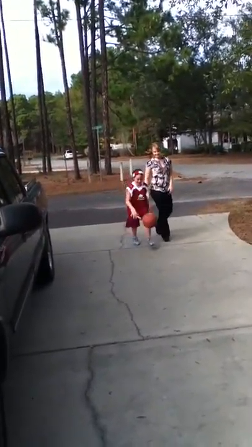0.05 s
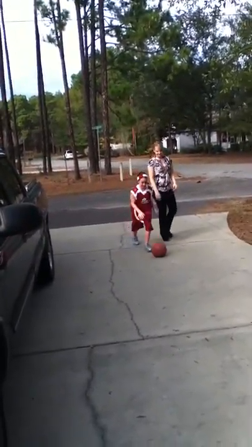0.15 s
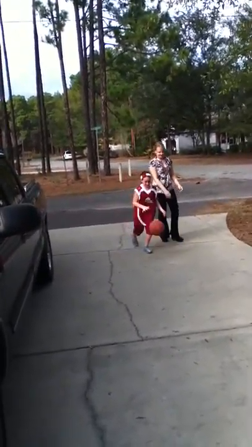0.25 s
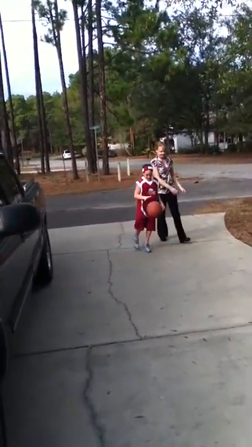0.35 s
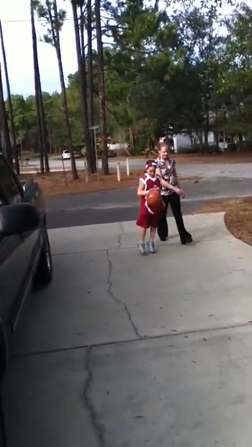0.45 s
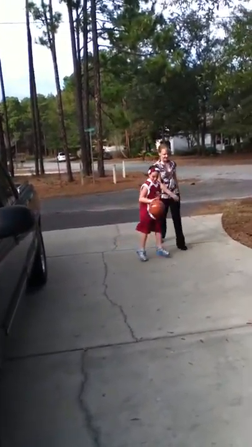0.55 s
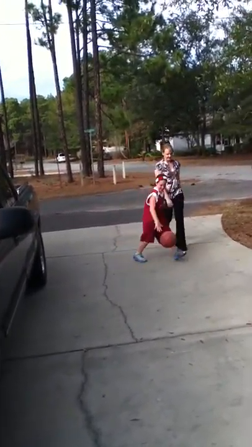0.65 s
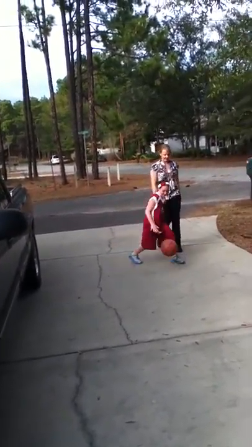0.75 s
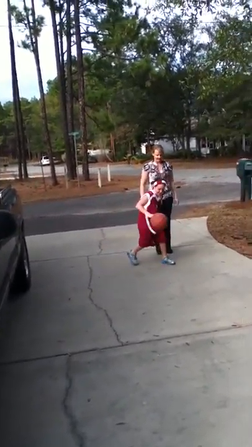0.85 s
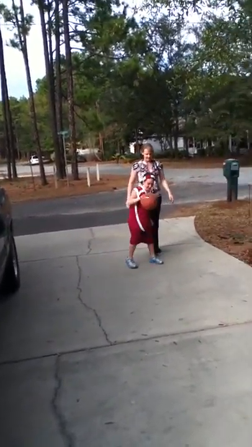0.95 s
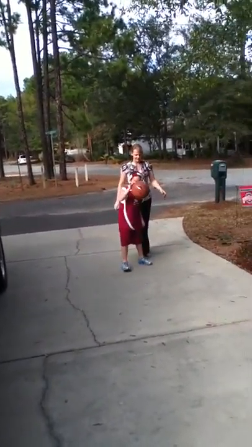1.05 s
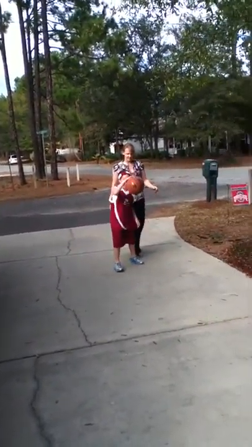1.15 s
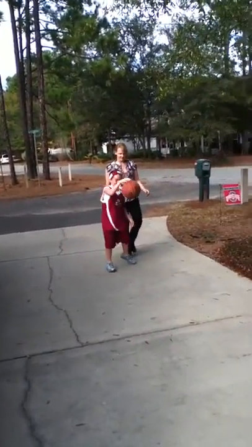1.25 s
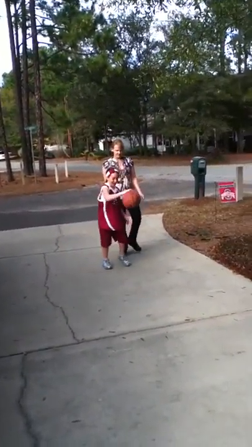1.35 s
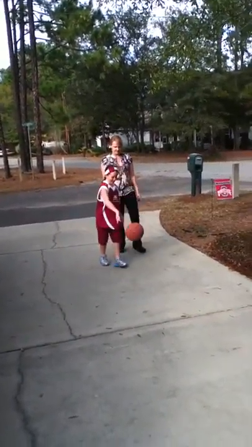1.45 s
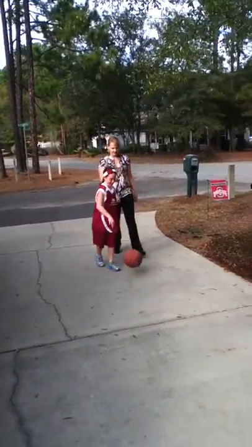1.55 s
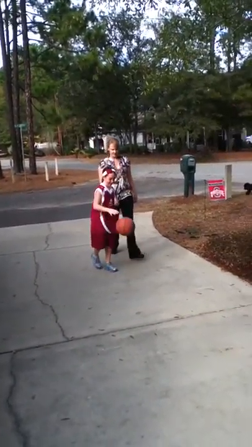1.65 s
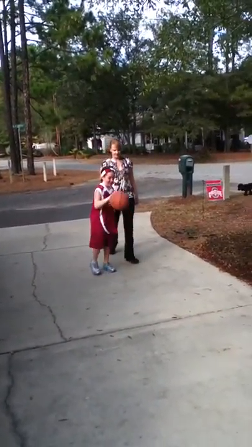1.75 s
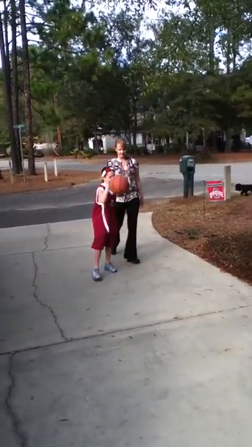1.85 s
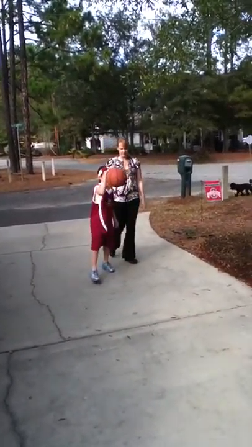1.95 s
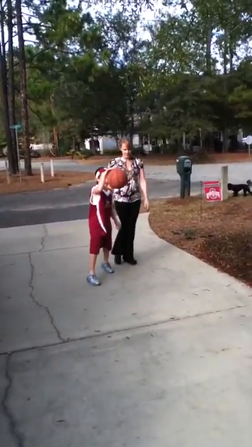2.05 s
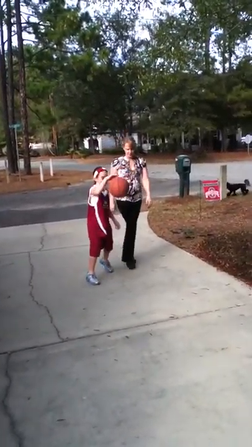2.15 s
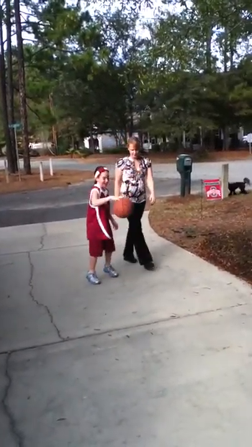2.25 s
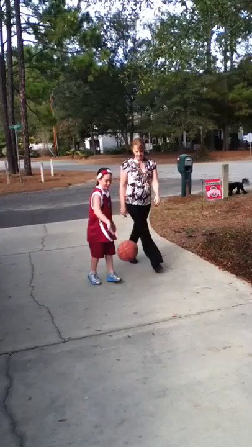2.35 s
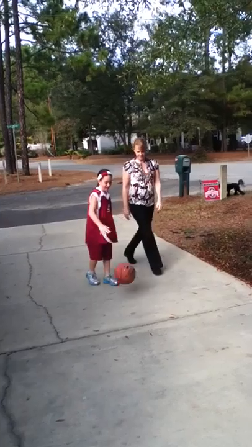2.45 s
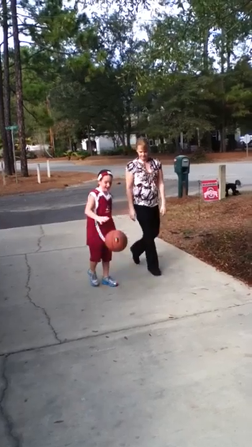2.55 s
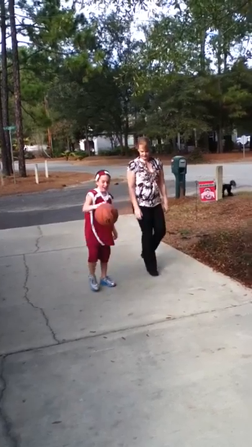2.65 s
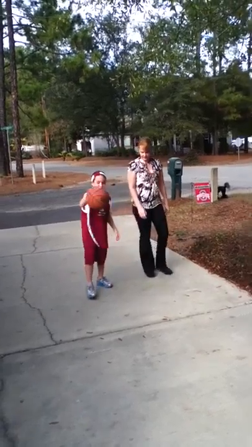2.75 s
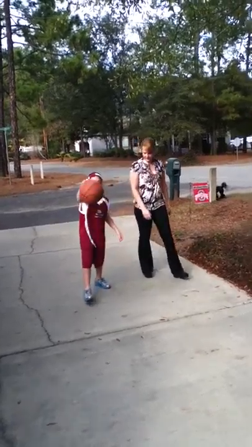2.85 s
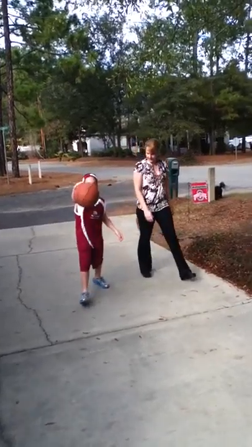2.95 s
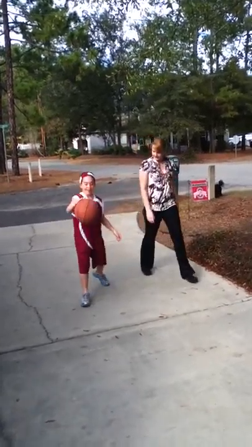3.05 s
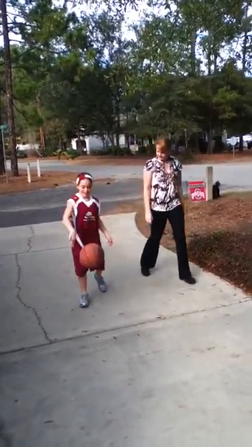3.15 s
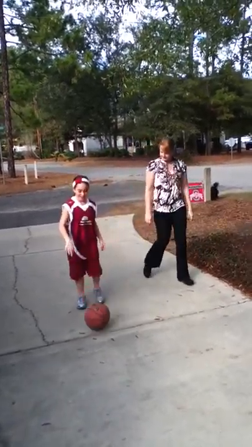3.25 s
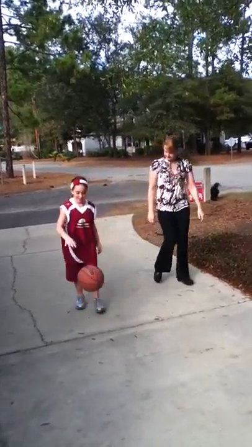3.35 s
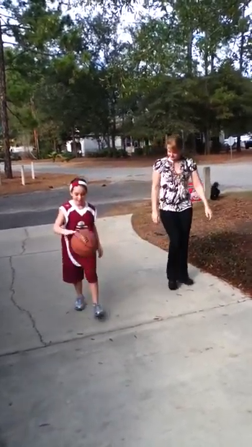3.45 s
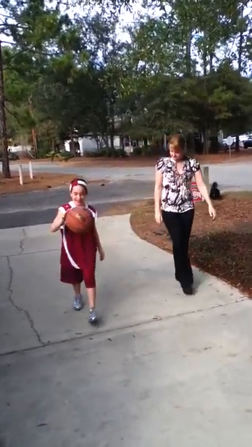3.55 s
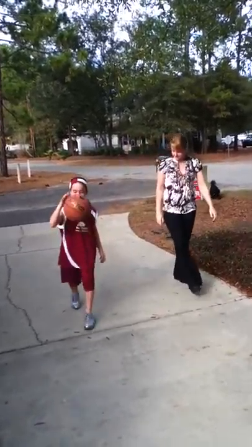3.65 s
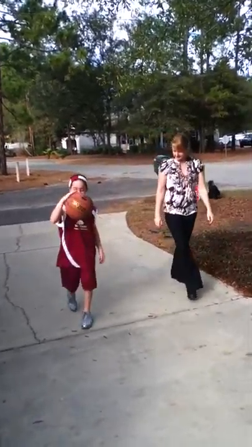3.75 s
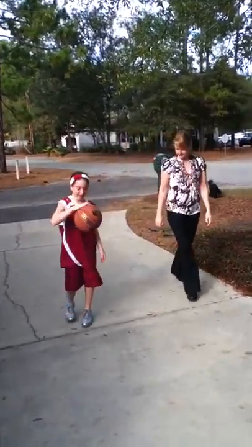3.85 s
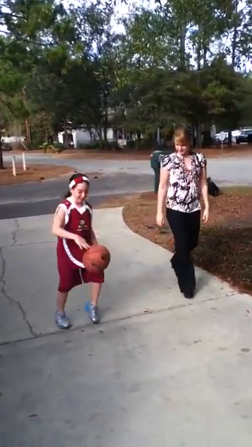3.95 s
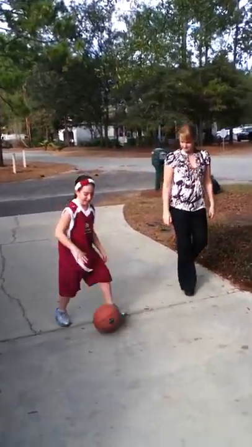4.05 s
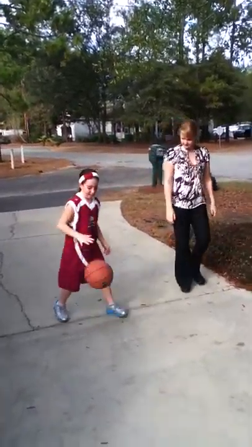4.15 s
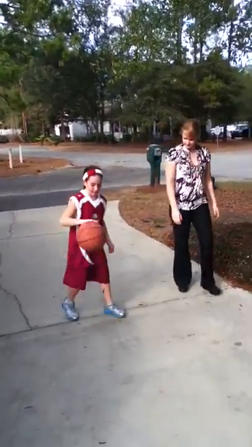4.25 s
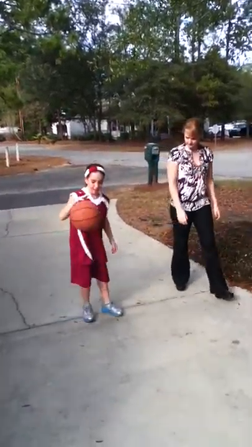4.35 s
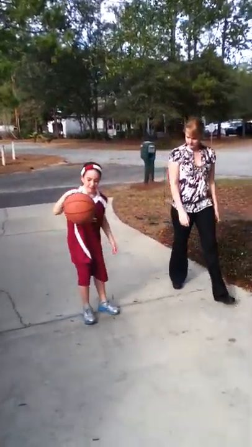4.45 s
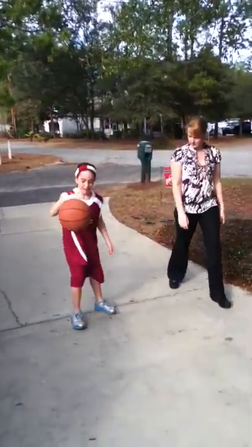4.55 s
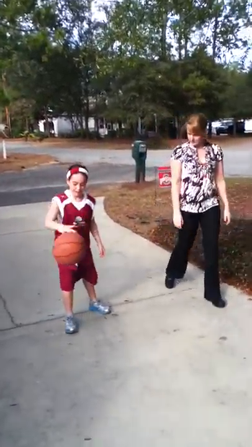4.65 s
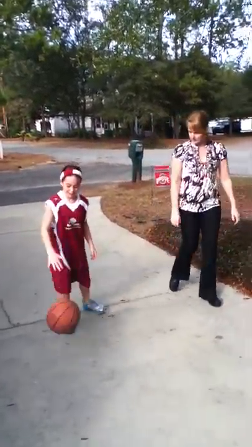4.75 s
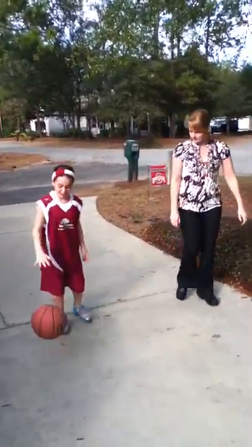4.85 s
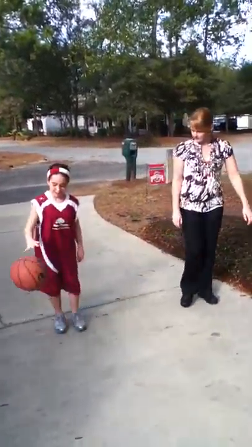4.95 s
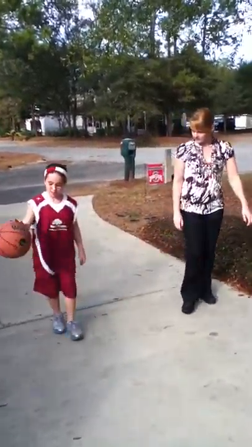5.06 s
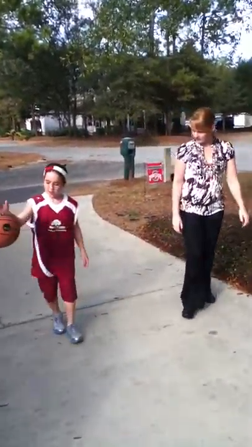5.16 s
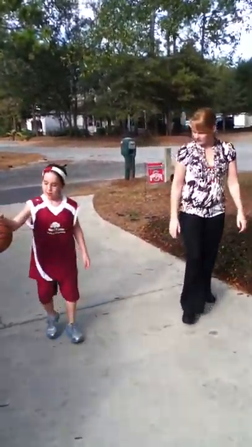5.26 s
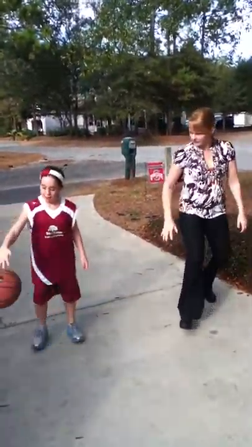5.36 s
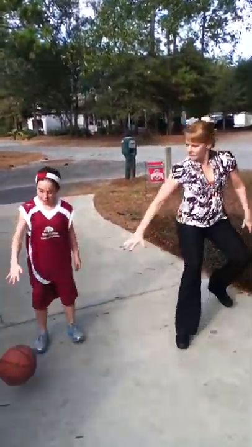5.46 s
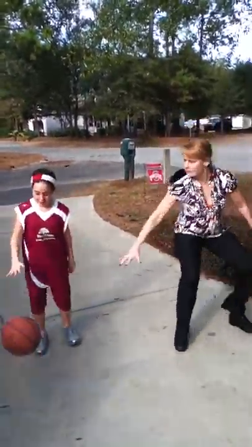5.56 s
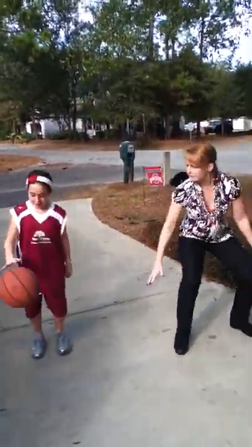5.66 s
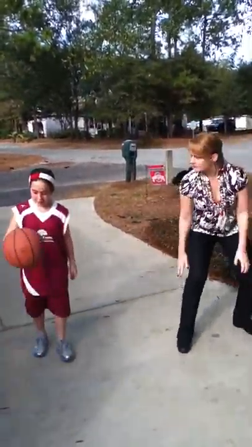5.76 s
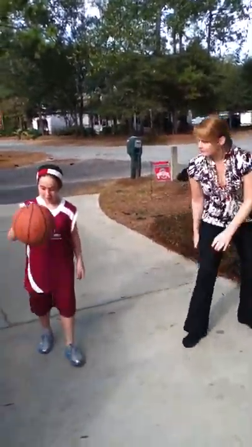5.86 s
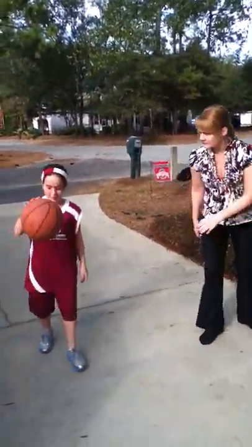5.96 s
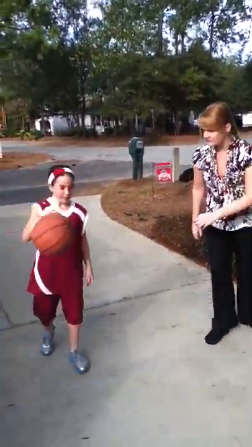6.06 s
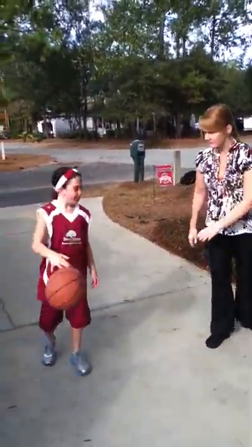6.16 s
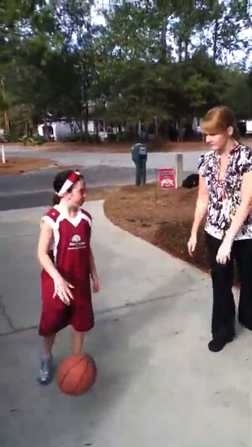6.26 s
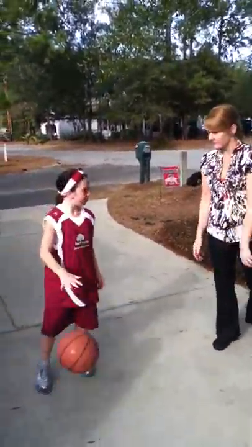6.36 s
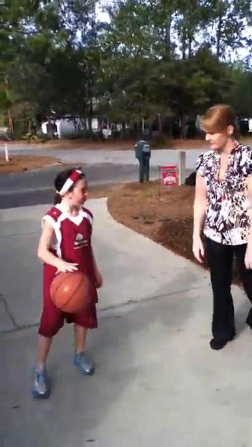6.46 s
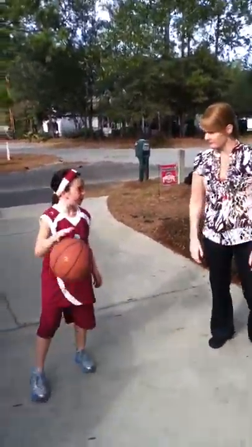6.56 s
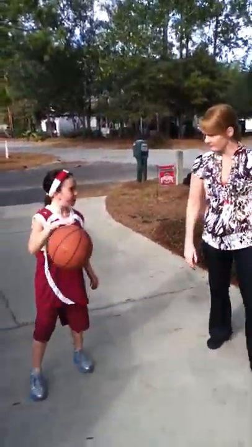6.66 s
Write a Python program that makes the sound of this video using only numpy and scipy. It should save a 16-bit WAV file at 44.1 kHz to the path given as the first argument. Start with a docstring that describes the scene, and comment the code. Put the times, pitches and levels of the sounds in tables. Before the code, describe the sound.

A basketball is dribbled on a concrete driveway close to a hand-held microphone, nine sharp slaps at an easy pace, each with a low thud, a faint ping and a short outdoor echo. Shoes step and scuff on grit between bounces. Distant traffic and leaves rush softly, with a few faint, thin chirps early on. Near the end a hand smacks the ball, a sole drags and a gust buffets the microphone.

```python
"""A basketball bounces on a concrete driveway, close to a hand-held microphone. Each bounce is a slap,
a thud while the ball is squashed and a faint ping of the air inside; a garage door and trees answer.
Hands slap the ball, and shoes land, scuff and drag on grit. Far traffic and leaves rush behind a few
thin chirps, and at the end a gust buffets the microphone."""
import sys
import numpy as np
from scipy import signal
from scipy.fft import rfft, irfft, next_fast_len
from scipy.io import wavfile
from scipy.ndimage import uniform_filter1d, map_coordinates

SR = 44100
rng = np.random.default_rng(int(sys.argv[2]) if len(sys.argv) > 2 else 0)


def master(y):
    """Save y as 16-bit WAV."""
    cut = np.clip(np.atleast_2d(y).T, -1, 1)
    pcm = np.round(cut * 32767)  # scale
    wavfile.write(sys.argv[1], SR, pcm.astype(np.int16))


N = 296352

# modes of the ball's skin: (frequency [Hz], level [dB], t60 [s])
SKIN_MODES = [(483.4, -11.5, 0.081), (621, -2.5, 0.028), (880, -6.5, 0.028), (1625, -2, 0.0081),
              (3120, -2, 0.0038)]


def ball():
    """Each bounce: a slap, a thud, the skin ringing at touch and lift-off, then the ping in flight."""
    # (time [s], slap [dB], squash [dB], bulge [dB], skin [dB], flutter [dB], flutter [Hz], ping [dB])
    bounces = [(0.3202, -1, -13, -2, -13, -1.5, 1343, -62), (0.8702, 1, -20, -6.5, -18, -8, 1330, -57),
               (1.6954, 2.5, -14, -13.5, -16, -23, 1300, -54.5), (2.588, 3, -16, -16, -23, -19, 1440, -61),
               (3.4283, -2, -17, -4.5, -15, -23, 1370, -54.5),
               (4.227, 3.5, -15.5, -25, -14.5, -15, 1455, -54), (4.9715, 0, -14, -4, -12.5, -16, 1340, -55),
               (5.652, -3, -19.5, -5.5, -18, -26, 1400, -61), (6.4551, -3, -11, -5, -9, -16.5, 1420, -48.5)]
    # the skin springs back at lift-off: (frequency [Hz], level [dB], t60 [s])
    peel_modes = [(1400, 0, .018), (1620, -4, .015), (950, -6, .02)]
    track, t = np.zeros(N), np.arange(SR) / SR
    onset = 1 - np.exp(-t / .0022)
    for s, slap_db, squash_db, bulge_db, skin_db, flutter_db, flutter_hz, ping_db in bounces:
        width_s = (.23 + .0077 * bulge_db) / 1000  # the slap widens with the bulge
        impact = amp(slap_db) * (slap(t / width_s) + onset * scatter(t))
        body = onset * thud(t, squash_db, bulge_db)
        smack = lowpass((decay(t, .013) + decay(t, .092, -4.5)) * rng.standard_normal(SR), 4000)
        skin = amp(skin_db) * (ring(SKIN_MODES, t, spread_db=2, detune=.03) + 1.5 * smack)
        skin *= t > width_s  # heard once the slap's pulse has passed
        flutter = np.sin(2 * np.pi * flutter_hz * np.maximum(t - .0002, 0))  # the skin's strongest mode
        flutter *= decay(t, .018, flutter_db)
        peel = amp(skin_db - 1) * onset * ring(peel_modes, t, spread_db=2.5, detune=.051)
        peel = np.roll(peel, round(.0095 * SR))
        add(track, s, impact + body + skin + flutter + peel + amp(ping_db) * ping(t))
    return track


def slap(widths, round_trip_s=.001343):
    """Trapped air shoots out; the pulse crosses the ball and returns twice. Time is in pulse widths."""
    push = np.sin(np.pi * np.minimum(widths, 1)) ** 2
    pulse = push - 1.9 * np.exp(-widths) * np.clip(widths - .8, 0, 1)
    echoes = sum((-.35) ** k * np.roll(pulse, round(k * round_trip_s * SR)) for k in (1, 2))
    return lowpass(pulse + echoes, 12000, order=3)


def scatter(t):
    """Rough ground and trunks spread the slap into a short hiss."""
    hiss = decay(t, .17, -36) * rng.standard_normal(len(t))
    return filtered(hiss, lambda hz: 1j * hz / (1500 + 1j * hz) / (1 + 1j * hz / 6000) ** 2)


def thud(t, squash_db, bulge_db, squash_hz=138, bulge_hz=251.5, contact_s=.0125):
    """The flattened ball's two low modes, partly choked as it leaves the ground."""
    squash = -np.sin(2 * np.pi * squash_hz * (t - .0004)) * decay(t, .11, squash_db)
    bulge = np.cos(2 * np.pi * bulge_hz * t) * decay(t, .034, bulge_db)
    on_ground = 1 / (1 + np.exp(np.clip((t - contact_s) / .0017, -50, 50)))
    return (squash + bulge) * (on_ground + .4)


def ping(t):
    """The air inside rings; each mode wavers as spin turns it towards the microphone and away."""
    # (frequency [Hz], level [dB], t60 [s])
    air_modes = [(2190, -7, .45), (2866, -5, 1.6), (3250, -11, .8), (3515, -7, 1.2), (3745, -7, .5),
                 (4136, -10, 1.5), (4432, -8, 1.2), (4748, -10, 1.2), (5270, -10, 1.2), (5932, -11, 1.5)]
    ringing = np.zeros(len(t))
    for mode in air_modes:
        spin_db = 2 * wobble(10, len(t)) + 4 * wobble(70, len(t))
        ringing += amp(spin_db) * ring([mode], t, spread_db=1.5, detune=.001)
    return ringing * (1 - np.exp(-t / .049))


def smacks():
    """A shoe strikes the concrete at 4.09 s, then palms hit the ball: each a crack, a puff and a ring."""
    # (time [s], crack [dB], body [dB], pitch and decay rate [factor])
    hits = [(4.0897, -30, -27, 1.39), (5.567, -27, -34, 0.69), (5.5952, 0, -15.5, 1.3),
            (5.704, -16, -24.5, 1.16), (5.711, -50, -23.5, 1.22), (6.629, -48, -33, 2.14)]
    track, t = np.zeros(N), np.arange(SR // 8) / SR
    for s, crack_db, body_db, factor in hits:
        crack = decay(t, .003, crack_db) * np.sin(2 * np.pi * 3000 * t)
        puff = lowpass(decay(t, .028, 9.5) * rng.standard_normal(len(t)), 3000)
        ringing = ring(SKIN_MODES[:4], factor * t, spread_db=3.5, detune=.023)
        add(track, s, crack + amp(body_db) * (puff + ringing))
    return track


def scuffs(faint_count=70):
    """Short sprays of grit under a sole, each with its own colour; fainter ones fall at random."""
    # (time [s], level [dB], centre [Hz], t60 [s])
    sole_scuffs = [(0.723, -32, 4600, 0.039), (0.832, -30.5, 3520, 0.092), (1.2365, -36, 5700, 0.068),
                   (1.525, -37.5, 1280, 0.048), (1.6303, -34, 3000, 0.11), (1.9041, -38, 5450, 0.088),
                   (2.192, -34, 2980, 0.04), (2.208, -34, 4200, 0.047), (2.32, -33.5, 6000, 0.034),
                   (2.5255, -34.5, 3360, 0.079), (3.126, -34, 5400, 0.019), (3.1914, -34.5, 6800, 0.067),
                   (3.275, -36.5, 7800, 0.08), (3.772, -41, 4200, 0.052), (3.935, -37.5, 6900, 0.065),
                   (4.0893, -14.5, 8500, 0.055), (4.0906, -22.5, 2780, 0.077), (4.118, -21, 9700, 0.01),
                   (4.1288, -18, 9500, 0.0066), (4.377, -30, 7660, 0.02), (4.636, -34, 8500, 0.039),
                   (4.742, -32.5, 3560, 0.1), (4.9319, -34, 2240, 0.23), (6.252, -30.5, 3980, 0.027)]
    track, t = np.zeros(N), np.arange(SR // 6) / SR
    for s, db, centre_hz, t60 in sole_scuffs:
        add(track, s, spray(t, db, centre_hz, t60))
    for when, size, colour in rng.random((faint_count, 3)):
        add(track, when * N / SR, spray(t, -52 + 6 * size, 3500 * (1 + 1.7 * colour), t60=.053))
    return track


def spray(t, db, centre_hz, t60):
    """A burst of grit grains in one broad resonance."""
    grains = rng.standard_normal(len(t)) * amp(4 * rng.standard_normal(len(t)) + 4 * wobble(600, len(t)))
    band = lambda hz: (1j * hz * centre_hz / (centre_hz ** 2 - hz ** 2 + 1.5j * hz * centre_hz)) ** 2
    rise_s = .0065 * np.exp(-.17 * (db + 35))  # harder scuffs bite sooner
    return decay(t, t60, db) * (1 - np.exp(-t / rise_s)) * unit(filtered(grains, band))


def drags(swell_db_per_s=114, sag_db_per_s=52, edge_db=26):
    """A sole lands, speeds up, slows and lifts: dense grains, brightest when fastest."""
    # (start [s], fastest [s], end [s], level [dB], brightness [dB])
    strokes = [(0.063, 0.162, 0.21, -44.5, -7), (0.644, 0.66, 0.98, -53, 11.5),
               (4.094, 4.116, 4.11, -34, 0), (4.467, 4.466, 4.56, -43.5, -11),
               (4.537, 4.57, 4.578, -41.5, -11), (5.226, 5.251, 5.262, -31.5, -14.5),
               (5.579, 5.588, 5.599, -24, -3.5), (5.926, 6.06, 6.137, -27.5, 3.5)]
    # sole on concrete: (frequency [Hz], relative level [dB])
    grit_spectrum = [(290, -40), (500, -7.5), (778, -8), (2350, -6), (3560, -2), (9280, -3), (17000, -19.5)]
    grit = rush(grit_spectrum, patchy_db=1.5, lumps=amp(1.5 * wobble(400) + 4.5 * rng.standard_normal(N)))
    treble = filtered(grit, lambda hz: hz ** 2 / (hz ** 2 + 6000 ** 2))
    track = np.zeros(N)
    for start, fastest, end, db, bright_db in strokes:
        first_db = db - swell_db_per_s * (fastest - start)
        last_db = db - sag_db_per_s * (end - fastest)
        landing = (start - .075 * (end - start), first_db - edge_db)
        lifting = (end + .14 * (end - start), last_db - edge_db)
        outline = [landing, (start, first_db), (fastest, db), (end, last_db), lifting]
        level_db = curves(outline, outside=-120)[0]
        treble_gain = amp(bright_db + .17 * (level_db - db))
        track += amp(level_db) * (grit - treble + treble_gain * treble)
    return track


def steps():
    """Soft heel landings, each one low push of about a cycle."""
    # (time [s], level [dB], pitch [Hz])
    heels = [(.722, -36.5, 215), (1.22, -39, 298), (1.473, -33, 110), (1.635, -36, 100), (2.19, -38.5, 111),
             (3.024, -36, 190), (4.087, -32, 293), (5.197, -35, 91)]
    track, t = np.zeros(N), np.arange(SR // 20) / SR
    for s, db, hz in heels:
        envelope = np.exp(-hz * t / .79) * (1 - np.exp(-hz * t / .21))
        add(track, s, amp(db + 6.5) * envelope * np.sin(2 * np.pi * hz * t))
    return track


def yard(near, tail_db=-16.5):
    """Flat walls send dull copies; trees and houses a diffuse tail, new every half second."""
    # (delay [s], level [dB])
    wall_echoes = [(0.041, -20.5), (.075, -26.5), (.021, -28.5)]
    # (frequency [Hz], t60 [s])
    tail_times = [(100, 0.5), (400, 0.36), (1500, 0.43), (5000, 0.45), (12000, 0.47)]
    dull = lowpass(near, 1800)
    echoes = sum(amp(db) * np.pad(dull, (round(delay * SR), 0))[:N] for delay, db in wall_echoes)
    block = SR // 2
    for start in range(0, N, block):
        hz, t, noise = signal.stft(rng.standard_normal(block), SR, nperseg=256)
        tail = signal.istft(noise * decay(t, along(tail_times, hz)[:, None]), SR, nperseg=256)[1]
        tail *= amp(tail_db) / np.linalg.norm(tail)
        add(echoes, start / SR + .006, signal.fftconvolve(near[start:start + block], tail))
    return echoes


def wind(calm_db=-39, strong_db=-29.5):
    """A breeze on the microphone turns to lumpy buffeting when strong, with eddies on top."""
    # (time [s], level [dB])
    wind_levels = [(0, -50), (.9, -49), (1.1, -57.5), (1.45, -51), (2.75, -51), (2.9, -49.5), (4.6, -53.5),
                   (4.9, -48.5), (5.4, -53), (5.5, -44.5), (5.7, -49), (5.82, -36.5), (5.88, -47.5),
                   (5.98, -39), (6.03, -56), (6.085, -34), (6.158, -43.5), (6.17, -30.5), (6.22, -28),
                   (6.29, -23.5), (6.42, -22.5), (6.56, -31.5), (6.67, -29), (6.72, -44)]
    # light and strong wind: (frequency [Hz], relative level [dB])
    breeze_spectrum = [(20, -4), (100, 4), (190, -3.5), (300, -15), (450, -27.5), (900, -86)]
    buffet_spectrum = [(25, -22), (110, -1), (200, -2), (330, -11), (550, -25), (1000, -50), (2500, -100)]
    level_db = curves(wind_levels)[0]
    strong = np.clip((level_db - calm_db) / (strong_db - calm_db), 0, 1)
    breeze = rush(breeze_spectrum, patchy_db=2, lumps=amp(1.6 * wobble(31)))
    buffet = rush(buffet_spectrum, patchy_db=1.5, lumps=amp(4.5 * wobble(50)))
    return amp(level_db) * (np.sqrt(1 - strong) * breeze + np.sqrt(strong) * buffet) + eddies(level_db)


def eddies(wind_db, start_s=6.05, end_s=6.69, small_count=26):
    """Single eddies burst on the microphone in the gust; smaller, random ones follow the wind's level."""
    # (time [s], level [dB], pitch [Hz])
    pops = [(6.215, -11, 206), (6.229, -8, 224), (6.29, -9, 174), (6.385, -8, 259), (6.404, -5, 295),
            (6.415, -9.5, 260), (6.498, -12, 292.5), (6.583, -13, 154), (6.624, -14.5, 215),
            (6.661, -13, 203)]
    small = []
    for when, size, tone in rng.random((small_count, 3)):
        s = start_s + when * (end_s - start_s)
        small.append((s, wind_db[int(s * SR)] + 4.5 + 6 * size, 130 + 130 * tone))
    track, t = np.zeros(N), np.arange(-SR // 50, SR // 50) / SR
    for s, db, hz in pops + small:
        cycles = hz * t
        before = .24 * np.exp(-((cycles + .5) / .68) ** 2)
        dip = 2 * np.exp(-np.sqrt((cycles / .16) ** 2 + .5))
        after = .5 * np.exp(-((cycles - .5) / .45) ** 2)
        add(track, s + t[0], amp(db) * (before - dip + after))
    return track


def traffic_and_leaves():
    """Far traffic rushes low and leaves hiss above it, both drifting in level."""
    # (time [s], traffic [dB], leaves [dB])
    levels = [(0, -50.5, -53.5), (.9, -48.5, -56), (1.1, -56, -60), (1.6, -52.5, -60), (2.7, -54.5, -63),
              (3.3, -54.5, -59), (4.9, -54, -59.5), (5.9, -56, -62.5), (6.72, -56.5, -59)]
    # (frequency [Hz], relative level [dB])
    traffic_spectrum = [(120, -16.5), (200, -8), (330, -12.5), (450, -10.5), (1100, -12), (1850, -22.5),
                        (2900, -27.5), (6000, -82)]
    leaf_spectrum = [(900, -11), (1700, -3), (4000, 0), (7000, -1), (12000, -2.5), (17500, -12.5)]
    traffic_db, leaves_db = curves(levels)
    traffic = amp(traffic_db + .6 * wobble(6)) * rush(traffic_spectrum, patchy_db=.8)
    leaves = amp(leaves_db + .16 * wobble(21)) * rush(leaf_spectrum, patchy_db=-.1)
    return traffic + leaves


def chirps(pitch_hz=7240):
    """A faint, thin tone flickers in short swells."""
    # (time [s], length [s], level [dB])
    swells = [(0.32, 0.26, -56.5), (1.853, 0.072, -55.5), (1.99, 0.063, -57.5)]
    envelope, t = np.zeros(N), np.arange(N) / SR
    for s, length, db in swells:
        progress = np.clip((t - s) / length, 0, 1)
        envelope += amp(db) * np.sqrt(np.abs(np.sin(np.pi * progress)))
    return envelope * wobble(160) * np.sin(2 * np.pi * pitch_hz * t)


def amp(db):
    return 10 ** (np.asarray(db) / 20)


def decay(t, t60, db=0):
    """An envelope that starts at db and falls 60 dB in t60 seconds."""
    return amp(db - 60 * t / t60)


def unit(x):
    return x / np.sqrt(np.mean(x ** 2) + 1e-20)


def along(points, hz):
    """Interpolates (frequency [Hz], value) points on a log axis."""
    knots_hz, values = np.transpose(points)
    return np.interp(np.log(hz + 1), np.log(knots_hz + 1), values)


def curves(rows, outside=None):
    """One value per sample for each column after the time."""
    s, *columns = np.transpose(rows)
    return [np.interp(np.arange(N) / SR, s, column, outside, outside) for column in columns]


def wobble(rate, size=N):
    """A smooth random curve, rate knots a second."""
    knots = rng.standard_normal(int(size * rate / SR) + 4)
    return map_coordinates(knots, [np.arange(size) * rate / SR])


def filtered(x, response):
    """x through a frequency response."""
    size = next_fast_len(len(x) + 8192)
    return irfft(rfft(x, size) * response(np.fft.rfftfreq(size, 1 / SR)), size)[:len(x)]


def lowpass(x, corner_hz, order=2):
    return filtered(x, lambda hz: 1 / (1 + 1j * hz / corner_hz) ** order)


def rush(spectrum, patchy_db, lumps=1):
    """Coloured noise of rms 1 with patches of random gain."""
    cells = signal.stft(lumps * rng.standard_normal(N), nperseg=512)[2]
    patches = uniform_filter1d(rng.standard_normal(cells.shape), size=6, axis=0)
    patches = uniform_filter1d(patches, size=12, axis=1)
    noise = signal.istft(cells * amp(patchy_db * unit(patches)), nperseg=512)[1][:N]
    return unit(filtered(noise, lambda hz: amp(along(spectrum, hz))))


def ring(modes, t, spread_db, detune):
    """Damped modes, varied in strength and pitch at every strike."""
    return sum(decay(t, t60, db + spread_db * rng.standard_normal())
               * np.sin(2 * np.pi * hz * (1 + detune * rng.standard_normal()) * t)
               for hz, db, t60 in modes)


def add(track, s, sound):
    """Lays a sound on the track at time s."""
    part = track[round(s * SR):][:len(sound)]
    part += sound[:len(part)]


def scene():
    """Ball and player close by, the yard's answer, the background and the wind, in mono."""
    near = ball() + smacks() + scuffs() + drags() + steps()
    return (near + yard(near) + traffic_and_leaves() + chirps() + wind())[None]


def record(dry, top_hz=17560):
    """The microphone drops deep bass and dulls the top; the input rounds off peaks and limits the band."""
    mic = filtered(dry[0], lambda hz: (1j * hz / (45 + 1j * hz)) ** 2 / (1 + 1j * hz / 11000))
    rounded = mic / (1 + np.abs(mic) ** 8) ** (1 / 8)
    return filtered(rounded, lambda hz: hz < top_hz)[None]


dry = scene()
out = record(dry)
master(out)
```